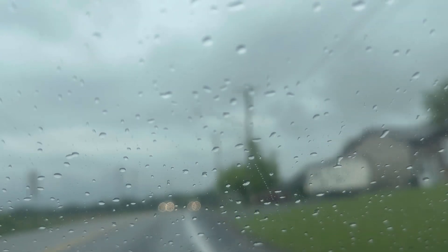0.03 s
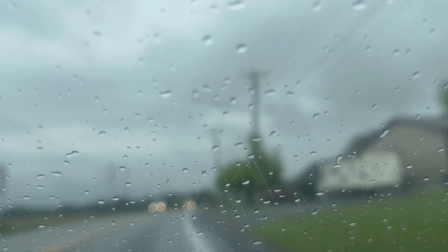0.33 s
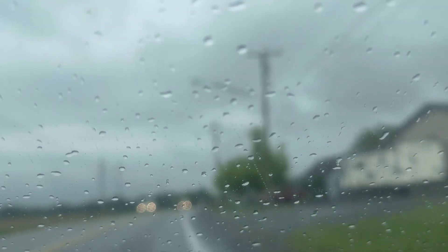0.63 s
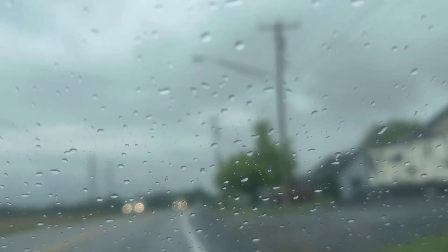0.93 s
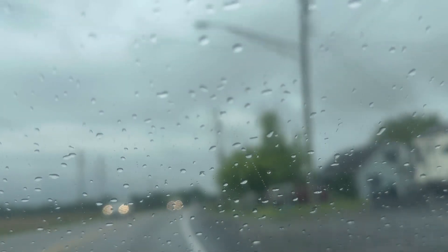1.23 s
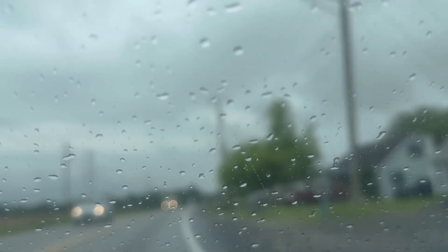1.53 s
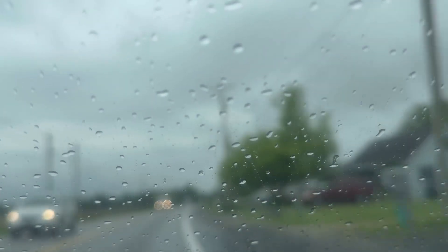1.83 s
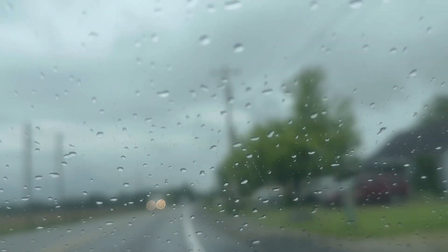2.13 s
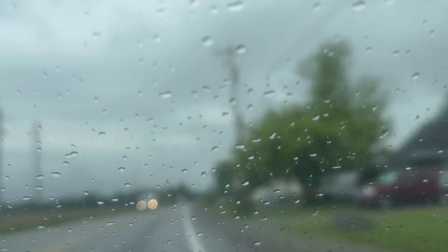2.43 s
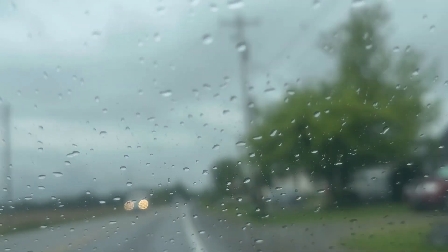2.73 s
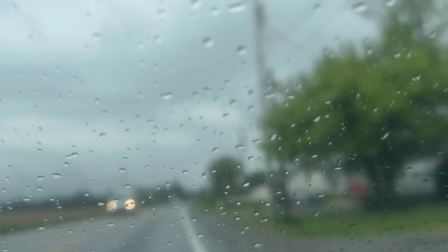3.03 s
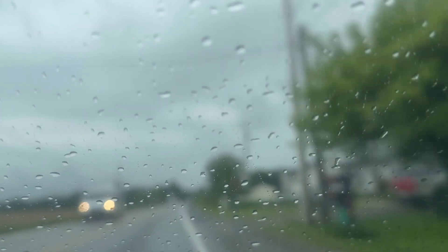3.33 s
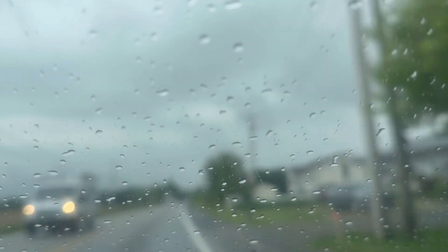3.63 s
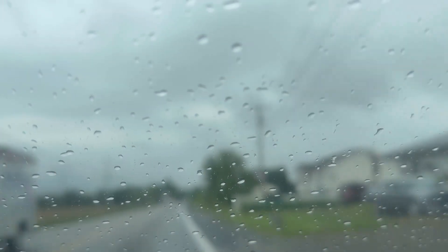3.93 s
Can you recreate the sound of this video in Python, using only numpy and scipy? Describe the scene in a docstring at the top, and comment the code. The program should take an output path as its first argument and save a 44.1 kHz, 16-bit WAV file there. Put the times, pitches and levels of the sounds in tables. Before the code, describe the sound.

Deep road rumble and tyre roar run throughout, heard inside a car on a wet road, with spray hiss, light rain ticks and a faint drivetrain hum. Dull bumps thud during the first 2.4 seconds, with brief splashes. A throbbing boom swells around 1.5 and 2.5 seconds. Heavier drops tap from 1.8 seconds, an oncoming car swishes past around 2.6, and a hollow knock comes at 3.3.

```python
"""A deep road rumble and a throbbing boom fill the cabin of a car driving on a wet road.
The road shakes the body through the suspension: the boom pulses with each wheel turn, uneven patches
thud, and there is one hollow double knock. The tyres roar and throw hissing spray, which swells as an
oncoming car goes by. Raindrops tick on the windscreen, a few heavier ones tap, water splashes
briefly, and a faint drivetrain hum sinks underneath."""
import sys
import numpy as np
from scipy import signal
from scipy.fft import rfft, irfft
from scipy.io import wavfile
from scipy.ndimage import uniform_filter1d

SR = 44100
rng = np.random.default_rng(int(sys.argv[2]) if len(sys.argv) > 2 else 0)


def wav_record(signal):
    """Record a signal, one row per channel, as 16-bit PCM in the file named by sys.argv[1]."""
    frames = np.transpose(np.atleast_2d(signal))
    bounded = np.clip(frames, -1, 1)
    # unit amplitude maps onto the largest positive 16-bit level
    quanta = np.round(bounded * 32767).astype(np.int16)
    wavfile.write(sys.argv[1], SR, quanta)


N = 176400


def road():
    """The road rumbles up through the suspension, its level gently wandering."""
    # Tone of the rumble. Each row: frequency in Hz, level in dB.
    spectrum = [(18, -102), (28, -84), (42, -58.5), (65, -58.5), (100, -58), (135, -62), (170, -68.5),
                (210, -67.5), (255, -66.5), (320, -68.5), (500, -79), (1000, -100)]
    # Rise and fall of the rumble. Each row: time in seconds, gain in dB.
    level = [(0, -2.5), (.45, 0.5), (.8, -3.5), (1.1, 0.5), (1.6, 0), (2.35, -1), (2.9, -1), (3.45, -3.5),
             (3.7, 0.5), (4, 0)]
    return steady(spectrum) * curve(level) * undb(0.81 * walk(4.7))


def boom():
    """The cabin's lowest air resonance drones and throbs once a wheel turn, the right side leading."""
    # Rise and fall of the drone. Each row: time in seconds, level in dB.
    level = [(0, -47), (.9, -50), (1.25, -38), (1.46, -33.5), (1.7, -38.5), (1.98, -43), (2.45, -36),
             (2.8, -37), (3.25, -39.5), (3.65, -49), (4, -55)]
    pitch_hz, wander_hz, lead_rad = 60, 3.65, 1
    wheel_turn_s, peak_s, swing_db = 0.111, 2.795, 4.5
    phase = 2 * np.pi * np.cumsum(pitch_hz + wander_hz * walk(14.1)) / SR
    sides = np.array([phase, phase + lead_rad + 0.5 * walk(18)])
    throb_db = swing_db * np.cos(2 * np.pi * (times() - peak_s) / wheel_turn_s)
    flutter_db = 2 * np.array([walk(24), walk(14)])
    return unit(np.sin(sides) * undb(throb_db + flutter_db)) * curve(level)


def thuds():
    """Each uneven patch lifts and rocks the body in a short, deep thud."""
    # Uneven patches of road. Each row: centre in seconds, length in seconds, level in dB.
    bumps = [(.07, 0.049, -36), (.29, 0.12, -27.5), (.42, 0.039, -35), (.54, 0.079, -28.5),
             (.645, 0.16, -31.5), (1.015, 0.12, -31), (1.11, 0.047, -32), (1.195, 0.037, -30.5),
             (1.495, 0.061, -31.5), (1.575, 0.034, -34), (2.01, .04, -31), (2.125, 0.033, -29),
             (2.23, 0.087, -29), (2.335, .045, -32)]
    # Dull tone of the shaken body. Each row: frequency in Hz, relative level in dB.
    tone = [(20, -18), (40, 1), (62, -0.5), (120, -4.5), (190, -15), (300, -28), (600, -22.5), (1500, -64)]
    lift, rock = ring(white(), tone)
    rock = rock * undb(4)  # rocking drives the sides in opposition and outweighs the lift
    return even(np.array([lift + rock, lift - rock]), span_s=0.068) * swells(bumps)


def tyres():
    """The tread roars near 1 kHz and flutters with the road surface."""
    # Tone of the roar. Each row: frequency in Hz, level in dB.
    spectrum = [(200, -84.5), (400, -70), (620, -69.5), (830, -66.5), (1020, -65), (1230, -70), (1560, -71),
                (1750, -77), (2020, -76.5), (2300, -86.5), (3500, -102)]
    # Slight drift of the roar. Each row: time in seconds, gain in dB.
    level = [(0, -0.2), (.3, -0.35), (.7, -0.051), (1.1, 0.14), (1.65, -0.56), (1.8, 0.87), (2.0, 0.44),
             (2.65, -0.35), (3.1, -0.41), (3.45, -0.052), (4, 0.4)]
    return steady(spectrum) * curve(level) * undb(0.83 * walk(27) + 0.96 * walk(49))


def oncoming():
    """Another car's tyre roar swells and fades behind the closed windows."""
    # Tone of the passing tyres. Each row: frequency in Hz, level in dB.
    spectrum = [(600, -90), (900, -60.5), (1200, -58.5), (1500, -74.5), (2000, -73), (3000, -112)]
    peak_s, length_s, gain_db = 2.606, 0.59, -4
    return steady(spectrum) * swells([(peak_s, length_s, gain_db)])


def spray():
    """Water thrown off the road makes a hiss and a brighter mist, both grainy with droplets."""
    # Tone of each layer. Each row: frequency in Hz, level in dB.
    hiss_spectrum = [(1000, -88.5), (2000, -77.5), (2900, -78), (4100, -81.5), (4900, -87.5), (6600, -89),
                     (8100, -90.5), (9200, -95), (10000, -104), (10700, -130)]
    mist_spectrum = [(4000, -102), (6500, -96.5), (8100, -88.5), (9200, -96.5), (10000, -105),
                     (10700, -130)]
    # Both layers peak as the other car passes. Each row: time in seconds, gain in dB.
    hiss_level = [(0, -2), (.8, -2), (1.15, 1), (1.5, -1), (2.1, -1.2), (2.55, 2), (2.9, 0), (3.25, 0),
                  (3.7, -0.5), (4, 0)]
    mist_level = [(0, -2), (.8, -0.5), (1.15, 0.5), (1.8, 1), (2.2, 3), (2.6, 6), (3.0, 3.5), (3.3, 3.5),
                  (4, 2)]
    hiss = steady(hiss_spectrum) * curve(hiss_level) * undb(0.5 * walk(12) + 1.4 * walk(500))
    mist = steady(mist_spectrum) * curve(mist_level) * undb(1.3 * walk(25) + walk(500))
    return hiss + mist


def rain():
    """Drops hit the windscreen in a light patter, with a few clearer ticks and heavier taps."""
    # Small sharp drops, then heavy ones on glass and roof. Each row: start in seconds, level in dB.
    small_drops = [(.254, -39), (.348, -31.5), (1.119, -42), (1.671, -47), (1.768, -41), (3.463, -33),
                   (3.832, -40)]
    heavy_drops = [(1.769, -28), (2.277, -31.5), (2.341, -30.5), (2.772, -29.5), (3.421, -34),
                   (3.462, -31.5), (3.547, -33)]
    # A bright tick and a rounder tap. Each row: frequency in Hz, relative level in dB.
    tick_tone = [(500, -18), (1500, 17.5), (3800, 8), (5200, -1), (8300, 5.5), (11000, -48.5)]
    tap_tone = [(200, -16), (480, 6), (750, 9), (1000, 7), (1400, -16.5), (3500, -16), (5500, -25.5),
                (8500, -20.5), (11000, -65.5)]
    drops_per_s, patter_db = 90, -54.5
    tick_decay_s, tap_decay_s = 0.0052, 0.013
    landings = rng.random(N) < drops_per_s / SR
    scatter_db = -0.5 * np.minimum(rng.exponential(size=N), 3.5)
    fade = np.exp(-1 / (tick_decay_s * SR))
    envelope = signal.lfilter([1], [1, -fade], landings * undb(scatter_db))
    patter = unit(white() * envelope) * undb(patter_db)
    ticks = white() * strikes(small_drops, tick_decay_s)
    taps = white() * strikes(heavy_drops, tap_decay_s)
    return ring(patter + ticks, tick_tone) + ring(taps, tap_tone)


def splashes():
    """Water slaps the body and spatters away in a gritty tail."""
    # Slaps of water. Each row: start in seconds, level in dB.
    slaps = [(.401, -44), (.537, -42.5), (.55, -46.5), (2.197, -44), (3.44, -48)]
    # Bright tone of the spatter. Each row: frequency in Hz, relative level in dB.
    tone = [(700, -24), (2000, 22), (4000, -21), (5500, 12.5), (8500, 14), (10000, 10), (11500, -44)]
    bursts = white() * strikes(slaps, decay_s=0.026)
    grit = unit(undb(1.4 * walk(300)))
    return ring(bursts * grit, tone)


def knocks():
    """Two damped panel resonances sound almost together in a hollow knock."""
    # Knocked panels. Each row: centre in seconds, length in seconds, pitch in Hz, level in dB.
    panels = [(3.302, 0.029, 384, -41), (3.305, 0.044, 271, -33.5)]
    out = 0
    for centre, length, hz, db in panels:
        resonance = [(hz / 4, -60), (hz, 0), (hz * 4, -60)]  # falls 30 dB an octave either side
        out = out + even(ring(white(), resonance), span_s=0.0067) * swells([(centre, length, db)])
    return out


def hum():
    """A faint drivetrain tone sinks slowly as the car loses a little speed."""
    # Course of the hum. Each row: time in seconds, pitch in Hz, level in dB.
    course = [(0, 262.7, -54.5), (1.45, 257.3, -55), (2.0, 253.3, -57.5), (2.402, 246.4, -52),
              (2.999, 241.6, -50), (3.4, 238.4, -70), (3.7, 234.4, -53.5), (4, 228, -50)]
    seconds, hz, db = np.array(course).T
    pitch_hz = np.interp(times(), seconds, hz) + 2.21 * walk(9.3)
    phase = 2 * np.pi * np.cumsum(pitch_hz) / SR
    tone = np.sin(np.array([phase, phase + 0.71]))
    return unit(tone * undb(2.1 * walk(21))) * undb(np.interp(times(), seconds, db))


def cabin(pair):
    """Standing waves make the two sides alike or opposed, louder or softer, by frequency."""
    # Likeness of the sides. Each row: frequency in Hz, in-phase share, quadrature share.
    likeness = [(30.2, 0.15, .1), (60.6, 0.6, 0.053), (86, 0.19, 0.85), (157, 0.13, 0.19), (240, 0.4, 0.18),
                (320, 0.033, 0.45), (391, -0.35, -0.2), (593, 0.41, 0.28), (740, 0.28, -0.059),
                (958, -0.036, -0.16), (1200, -0.74, 0.024), (1640, -0.59, 0.0098), (1810, 0.33, -0.13),
                (2220, -0.25, -0.53), (2600, -0.14, -0.073), (3020, 0.15, 0.03), (4560, 0.011, 0.39)]
    # Stereo balance. Each row: frequency in Hz, left over right in dB.
    balance = [(60, 0.5), (250, 3), (380, -1), (950, -4), (1300, 0.5), (1750, 4.5), (2500, 1.5),
               (3300, 7.5), (4100, 12), (5200, 3), (8000, 4), (9700, -2.5)]
    left, other = rfft(pair)
    shared = over_bins(likeness, column=1) + 1j * over_bins(likeness, column=2)
    right = shared * left + np.sqrt(np.clip(1 - np.abs(shared) ** 2, 0, 1)) * other
    lean = undb(over_bins(balance) / 2)
    return irfft(np.array([left * lean, right / lean]), N)


def glass(pair):
    """Quick reflections between the windows give the hiss a fine, hollow ripple."""
    decay_s, echo_db, full_above_hz = 0.013, -9.5, 3000
    t = times()
    echoes = white() * np.exp(-t / decay_s) * (t > 0.001)
    echoes = echoes / np.sqrt(np.sum(echoes ** 2, axis=1, keepdims=True))
    send = np.clip(np.fft.rfftfreq(N, 1 / SR) / full_above_hz, 0, 1) * undb(echo_db)
    return irfft(rfft(pair) * (1 + send * rfft(echoes)) / np.sqrt(1 + send ** 2), N)


def undb(db):
    """Decibels as a gain."""
    return 10 ** (np.asarray(db) / 20)


def unit(x):
    """Scale to rms 1."""
    return x / np.sqrt(np.mean(x ** 2))


def times():
    """Each sample's time in seconds."""
    return np.arange(N) / SR


def curve(rows):
    """A fader ride through (seconds, dB) points."""
    return undb(np.interp(times(), *np.array(rows).T))


def swells(rows):
    """Envelope of rounded bursts."""
    return sum(undb(db) * np.exp(-(2 * (times() - centre) / length) ** 2) for centre, length, db in rows)


def strikes(rows, decay_s):
    """Envelope of sudden hits that die away."""
    t = times()
    return sum(undb(db) * (t >= start) * np.exp(-np.abs(t - start) / decay_s) for start, db in rows)


def walk(rate):
    """Smooth random drift with spread 1, changing about rate times a second."""
    hz = np.fft.rfftfreq(N, 1 / SR)
    return unit(irfft(rfft(rng.standard_normal(N)) * np.exp(-(hz / rate) ** 2) * (hz > 0), N))


def white():
    """Two independent white noises."""
    return rng.standard_normal((2, N))


def steady(rows):
    """Two noises with a spectrum in dB per Hz."""
    return colour(white() * np.sqrt(SR / 2), rows)


def even(pair, span_s):
    """Hold the power of a pair of noises near 1 over a sliding span."""
    return pair / np.sqrt(uniform_filter1d(np.mean(pair ** 2, axis=0), int(span_s * SR)))


def over_bins(rows, column=1):
    """A table column spread over the spectrum, interpolated in log frequency."""
    rows = np.array(rows, float)
    log_hz = np.log(np.maximum(np.fft.rfftfreq(N, 1 / SR), 1))
    return np.interp(log_hz, np.log(rows[:, 0]), rows[:, column])


def colour(x, rows):
    """An equaliser through (Hz, dB) points, falling away above the last."""
    hz = np.fft.rfftfreq(N, 1 / SR)
    gain = undb(over_bins(rows)) / np.maximum(hz / rows[-1][0], 1) ** 2
    cepstrum = irfft(np.log(gain), N)
    cepstrum[1:N // 2] *= 2  # minimum phase: the ringing follows the hit
    cepstrum[N // 2 + 1:] = 0
    return irfft(rfft(x) * np.exp(rfft(cepstrum)), N)


def ring(x, rows):
    """Colour a white sound, roughly keeping its power."""
    return colour(x, rows) / np.sqrt(np.mean(undb(over_bins(rows)) ** 2))


def scene():
    """Boom, body and drivetrain play direct; road and water noise pass through the cabin's acoustics."""
    airborne = road() + tyres() + oncoming() + spray() + splashes() + rain()
    return boom() + thuds() + knocks() + hum() + glass(cabin(airborne))


def record(dry):
    """A steep low-pass cuts the top treble."""
    top_hz = 10900
    return signal.sosfilt(signal.ellip(10, 0.2, 80, top_hz, fs=SR, output="sos"), dry)


dry = scene()
out = record(dry)
wav_record(out)
```